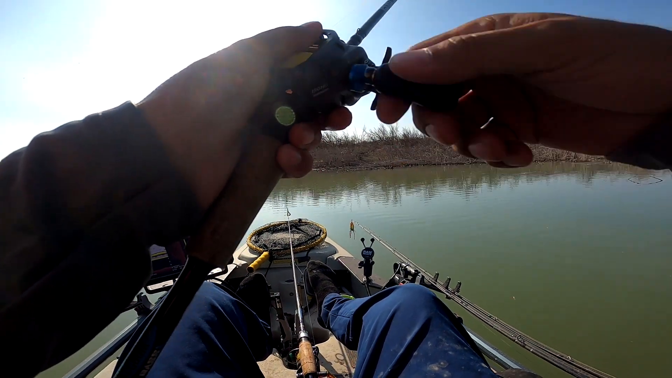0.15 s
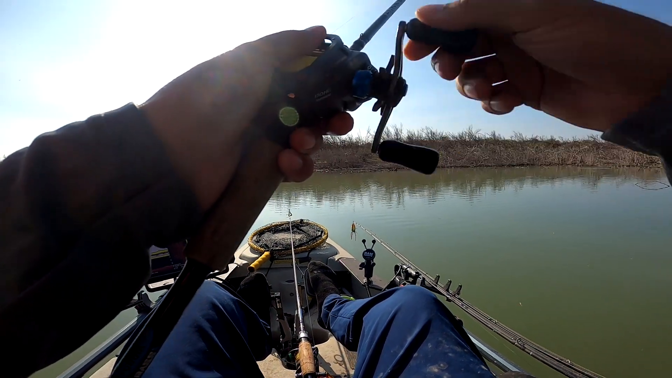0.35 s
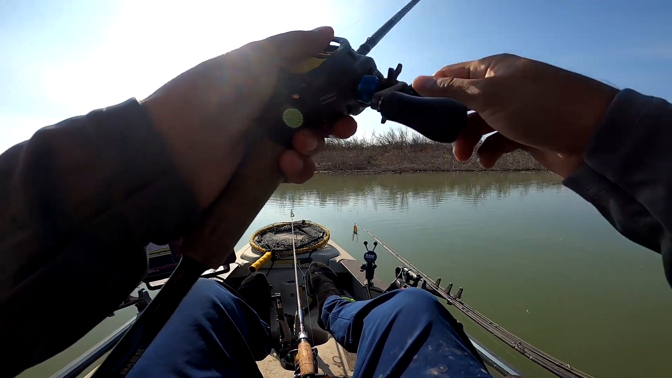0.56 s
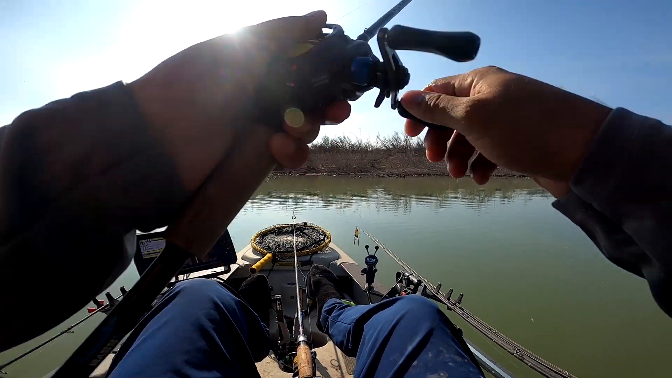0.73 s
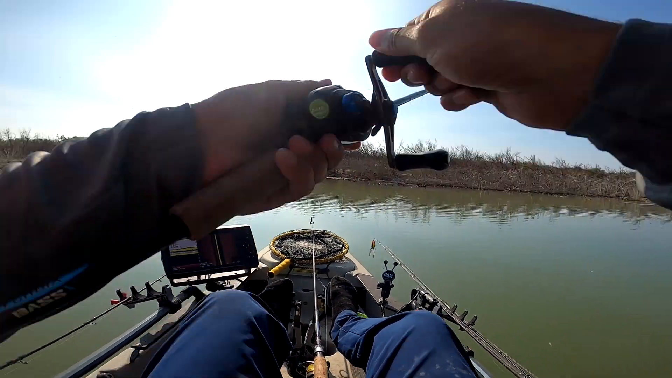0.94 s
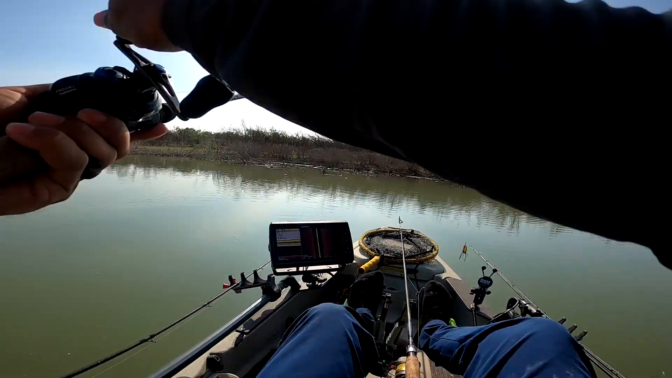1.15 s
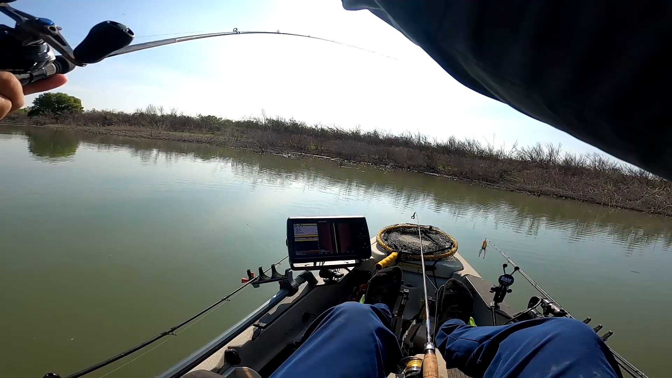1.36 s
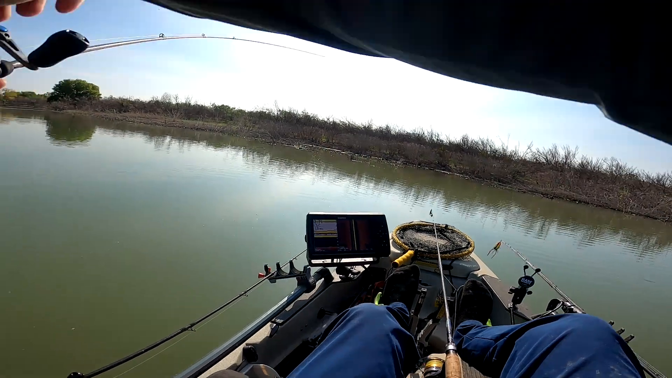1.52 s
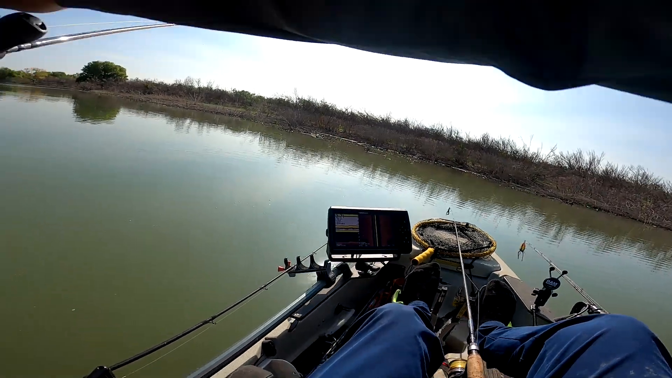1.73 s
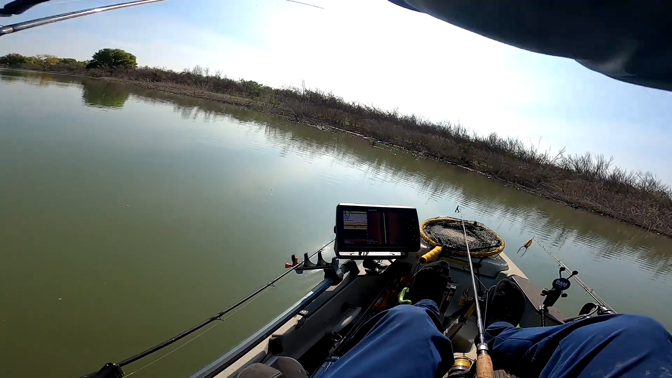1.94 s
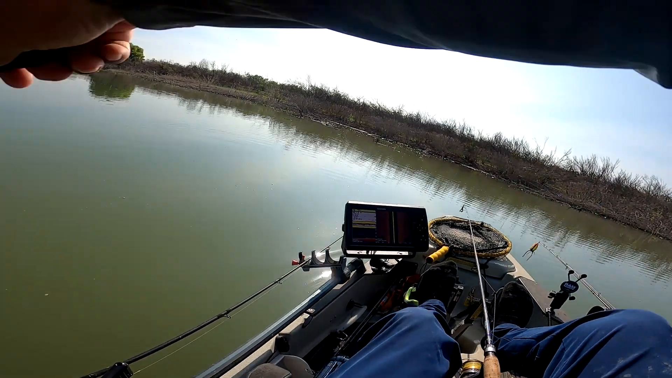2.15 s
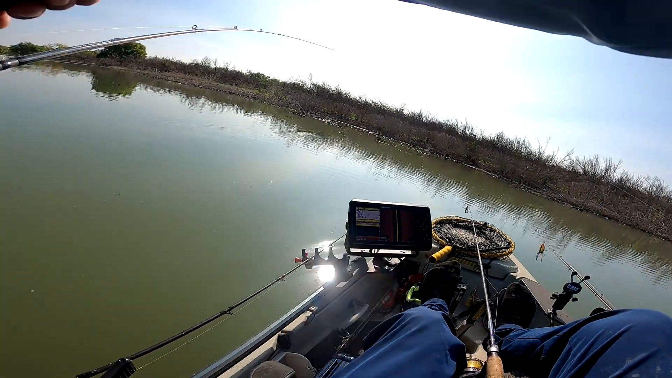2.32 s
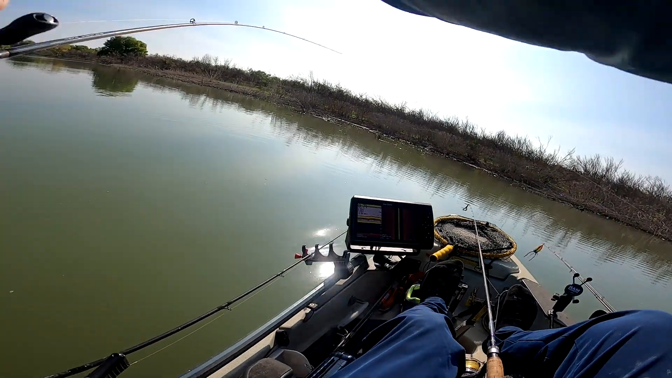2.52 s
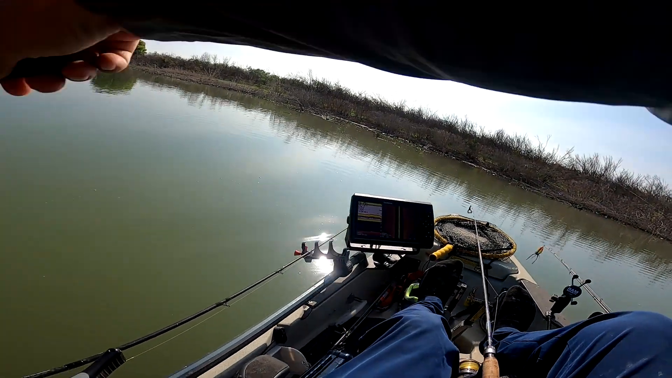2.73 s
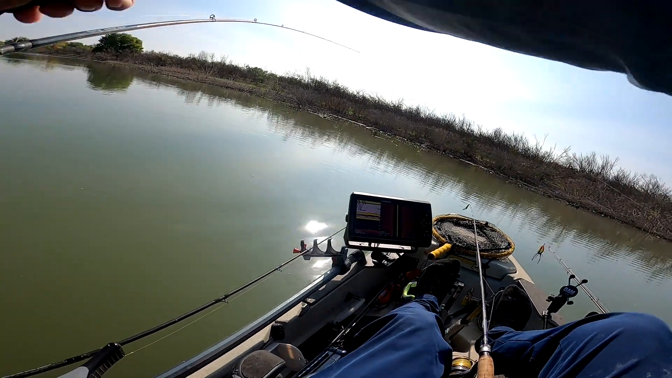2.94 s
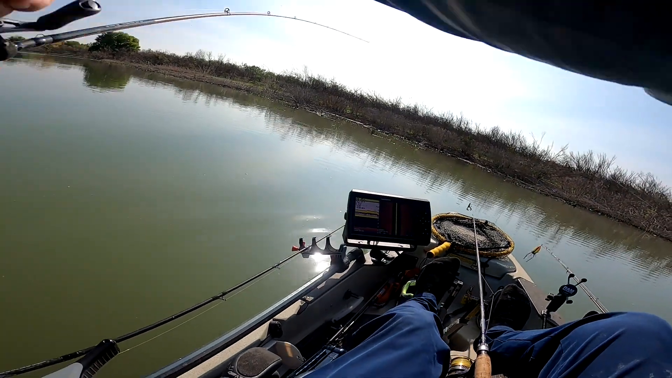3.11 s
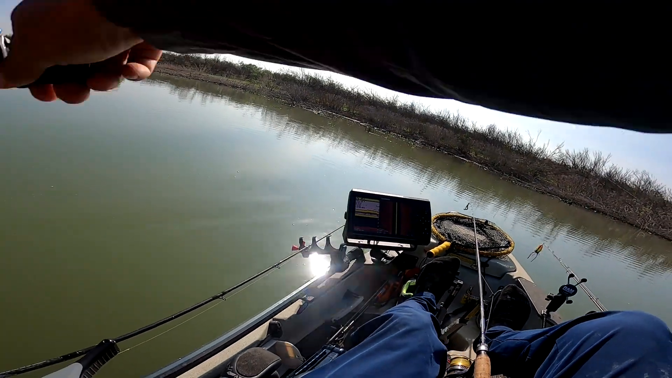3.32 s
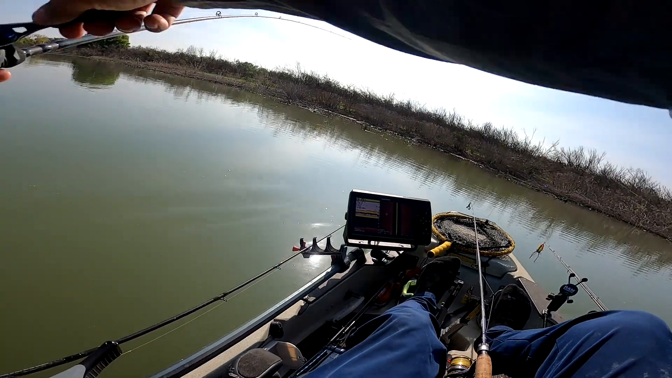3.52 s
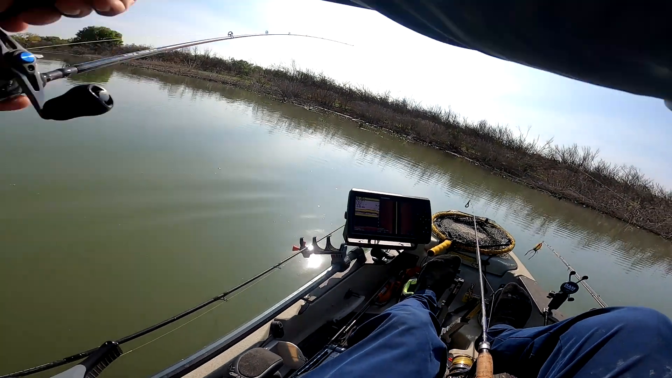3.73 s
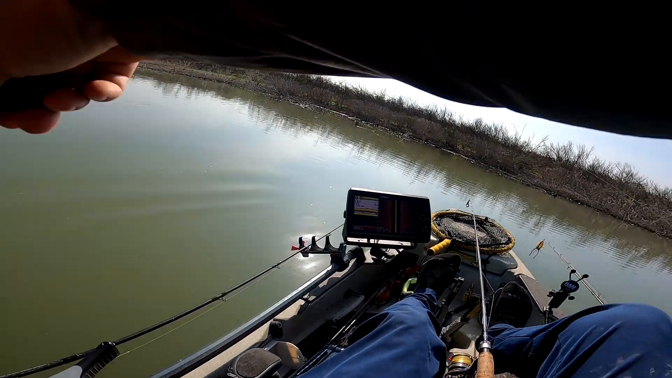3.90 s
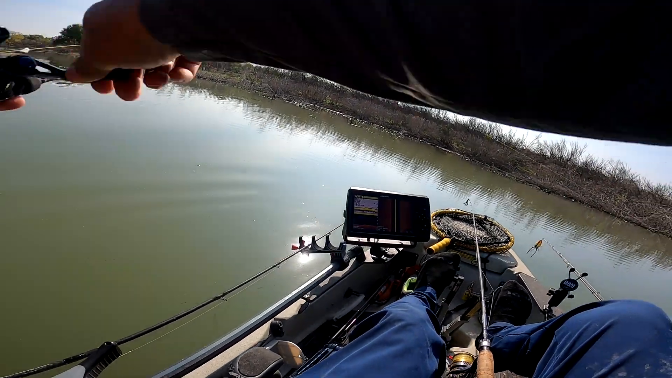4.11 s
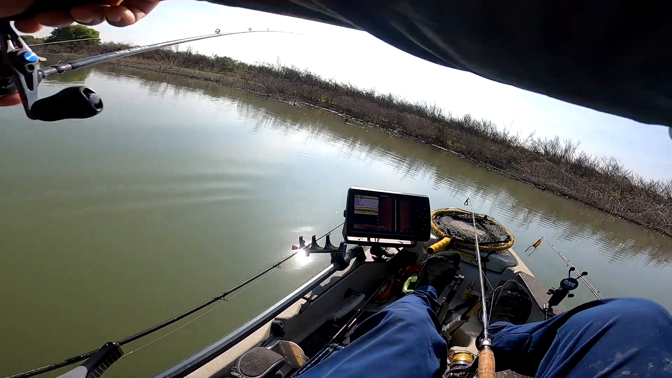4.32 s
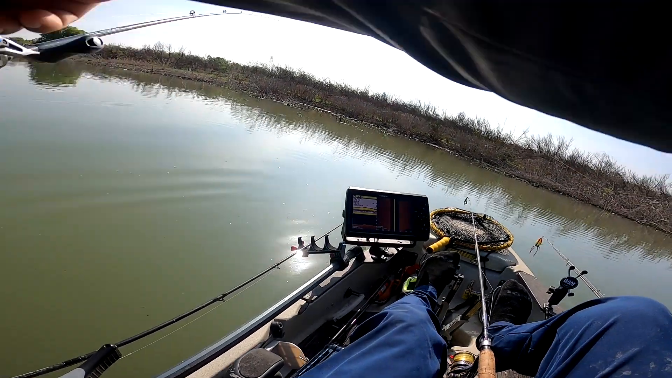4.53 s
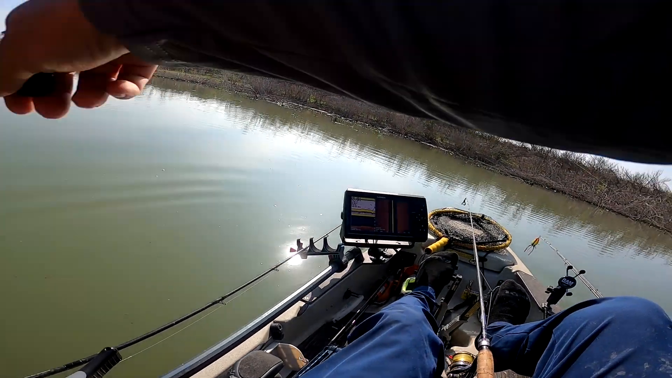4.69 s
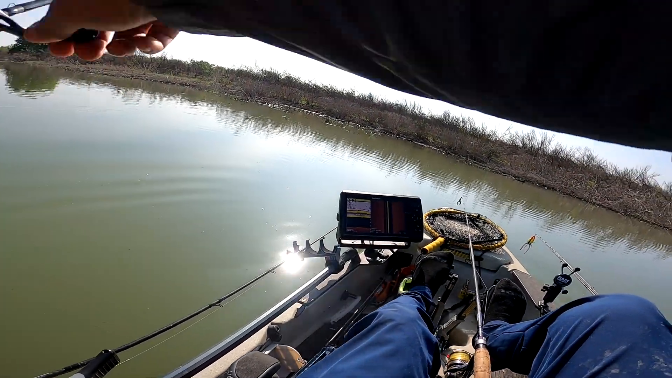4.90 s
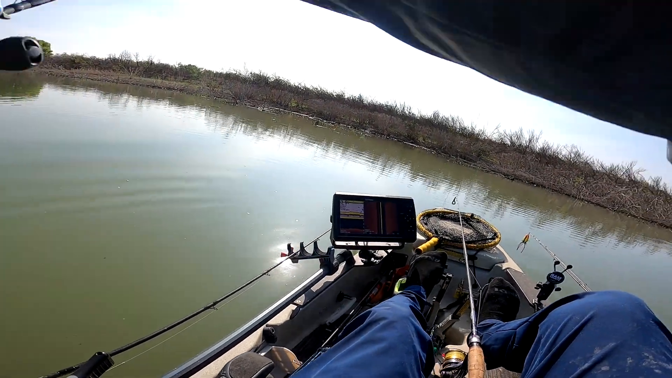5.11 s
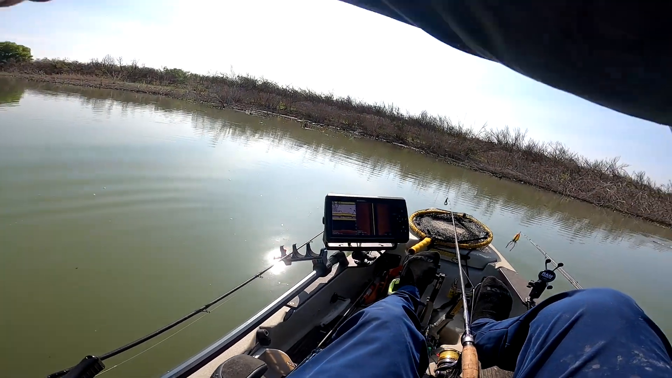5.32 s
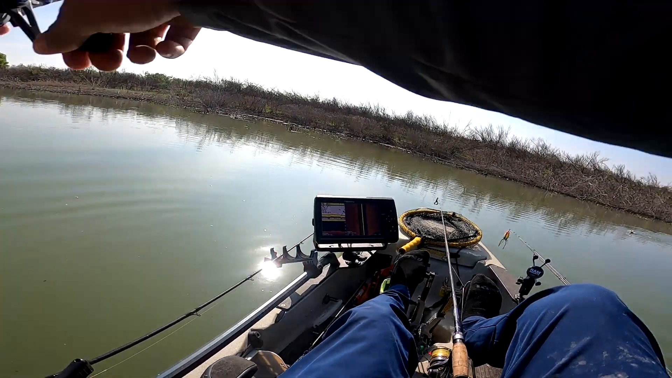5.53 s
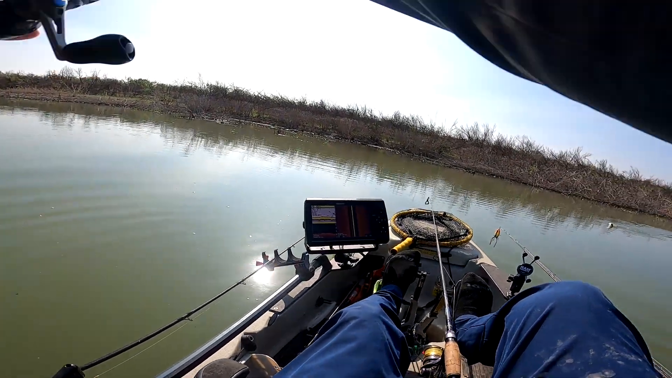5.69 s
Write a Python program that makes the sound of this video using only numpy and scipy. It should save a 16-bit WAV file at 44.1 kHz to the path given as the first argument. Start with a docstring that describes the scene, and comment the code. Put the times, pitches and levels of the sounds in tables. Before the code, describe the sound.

A fishing rod sweeps aside with jacket rustle and clicks, then the reel snaps into gear and is cranked hard with an uneven whine.

```python
"""An angler in a kayak, heard from a chest camera. First the reel winds slowly, a soft brush in its
housing. From 0.7 s the rod sweeps aside: air hisses, the jacket rumbles and rustles on the camera,
tackle clicks and the hull is knocked. At 1.77 s the clutch snaps in and the line rasps as it comes
tight. Then the reel is cranked hard to the end, its gear teeth whining at a pitch that follows the
uneven hand, among more rubs, clicks and knocks."""
import sys
import numpy as np
from scipy import signal
from scipy.fft import rfft, irfft, next_fast_len
from scipy.io import wavfile
from scipy.ndimage import uniform_filter1d

SR = 44100
rng = np.random.default_rng(int(sys.argv[2]) if len(sys.argv) > 2 else 0)


def log_audio(samples):
    """Write samples as a 16-bit WAV file to the path given in sys.argv[1]."""
    # one column per channel
    frames = np.atleast_2d(samples).T
    # limit to full scale, then quantise
    limited = np.clip(frames, -1, 1)
    pcm = np.round(limited * 32767).astype(np.int16)
    wavfile.write(sys.argv[1], SR, pcm)


N = 258137
T = np.arange(N) / SR
F = np.fft.rfftfreq(next_fast_len(N), 1 / SR) + 1

# the arm sweeps the rod aside and settles: t/s, jacket rumble/dB, jacket rustle/dB, air hiss/dB
ARM_SWEEP = [(0, -72, -64, -79), (.69, -54.5, -65, -56), (.728, -51, -47, -57), (.92, -37, -40, -41),
             (.98, -30.5, -37, -36.5), (1.07, -21.5, -27, -31.5), (1.115, -25, -29.5, -30.5),
             (1.165, -22.5, -28.5, -40), (1.25, -35, -46, -42), (1.375, -43, -57, -47),
             (1.48, -36, -51, -40.5), (1.64, -50, -52.5, -50), (1.72, -39, -43, -39.5),
             (1.77, -42.5, -45.5, -61), (2.45, -49, -45, -90), (2.95, -47.5, -50.5, -90),
             (4.45, -57.5, -59, -90), (5.86, -49.5, -46.5, -90)]
# single rubs of the jacket on the camera: t/s, half length/s, rumble/dB, rustle/dB
JACKET_RUBS = [(1.314, 0.056, -33.5, -43), (1.427, 0.041, -34.5, -49), (1.555, 0.026, -43, -43.5),
               (1.611, 0.021, -53, -36.5), (1.67, .03, -40, -63), (1.782, 0.016, -30.5, -58),
               (1.912, 0.036, -34, -30.5), (2.024, 0.038, -38, -37.5), (2.28, 0.14, -49.5, -57),
               (2.607, 0.069, -39, -45.5), (3.072, 0.014, -71, -47.5), (3.212, 0.016, -41.5, -46.5),
               (3.481, 0.046, -57, -42), (3.605, 0.027, -51, -49.5), (3.698, 0.037, -63, -38.5),
               (3.966, 0.037, -54, -40), (4.078, 0.055, -50, -71), (4.302, 0.015, -63, -41),
               (4.861, 0.038, -47, -63), (5.11, 0.08, -55, -49), (5.63, 0.022, -40.5, -38)]
# low end of the cloth: f/Hz, gain/dB
RUMBLE_EQ = [(8.8, 2.5), (15, 2), (70, -3), (97, -7.5), (222, -8.5), (272, -12.5), (400, -16.5), (520, -67),
             (880, -120)]
# crackle of the cloth: f/Hz, gain/dB
RUSTLE_EQ = [(120, -8.5), (250, -2.5), (450, -3.5), (800, -7.5), (1500, -15), (2800, -22.5), (5000, -23.5),
             (11000, -43), (16000, -63)]
# noise bands of a faint, steady drone: f/Hz, width/Hz, level/dB
DRONE_BANDS = [(79, 14, -73), (174.6, 61, -57.5), (684, 120, -69.5)]
# air hiss of the sweep: f/Hz, gain/dB
SWISH_EQ = [(600, -12), (1200, -2), (2700, -7.5), (5400, -17), (8500, -22), (10500, -31.5), (16000, -42)]

# sharp ticks of tackle, and finer, brighter ticks of the line running through its guides: t/s, peak/dB, f/Hz,
# left minus right/dB
SHARP_TICKS = [(0.769, -34, 2600, 8), (0.935, -33, 6270, 3), (1.051, -23, 2870, 1), (1.0864, -40, 3970, 4),
               (1.111, -11, 2800, 12), (1.1135, -17.5, 2100, 20), (1.1284, -20, 1820, 16),
               (1.1305, -22, 5200, 3), (1.1598, -26, 2000, 18), (1.168, -38, 8000, -1),
               (1.1972, -17.5, 2120, 5), (1.227, -32, 3900, 2), (1.2275, -35, 8400, -4),
               (1.28, -29, 4270, 11), (1.4277, -38, 5000, 9), (1.4454, -38, 2000, 11),
               (1.475, -28, 3700, 11), (1.4912, -25.5, 1690, 10), (1.683, -20.5, 3730, 9),
               (2.488, -33, 4260, 3), (2.671, -43, 5310, 4), (4.172, -51, 5635, 4), (4.337, -43, 5650, 4),
               (5.324, -35, 5100, 4), (5.399, -51, 8500, -2), (5.639, -43, 8000, -2),
               (5.6425, -44, 8030, -2)]
# ring of a tick: pitch ratio, gain/dB, t60/s
TICK_RING = [(1, 0, .007), (.6, -4, .007), (1.6, -5, .005), (2.3, -11, .004), (3.4, -22, .003)]
# duller clicks: t/s, peak/dB, f/Hz, left minus right/dB
TACKLE_CLICKS = [(0.635, -42, 1160, 1), (0.637, -41, 1650, 4), (0.729, -30, 980, 3), (1.063, -17.5, 910, 2),
                 (1.2, -25, 870, 2), (1.46, -22, 980, 11), (1.544, -35, 920, 1.5), (1.613, -26, 934, 13.5),
                 (1.634, -36, 1170, 3), (1.65, -36, 1030, 17), (5.102, -28, 1470, 1), (5.606, -24, 1032, 9),
                 (5.616, -35, 1063, 9), (5.6225, -31, 1071, 3), (5.639, -23.5, 983, 11)]
# ring of a click: pitch ratio, gain/dB, t60/s
CLICK_RING = [(1.023, 8, 0.016), (0.363, -6, 0.022), (0.66, -7.5, 0.02), (0.99, -11, 0.043),
              (2.52, -2, 0.009)]
# blows through hull and harness: t/s, peak/dB, f/Hz, left minus right/dB
HULL_KNOCKS = [(0.729, -31.5, 154, 3), (0.841, -30, 132, 4), (1.471, -22, 73.5, 6), (1.609, -26.5, 161, 6),
               (2.543, -15.5, 292.3, 1.5), (2.561, -17, 273.3, 1), (2.618, -28, 309, 1.5)]
# ring of a knock: pitch ratio, gain/dB, t60/s
KNOCK_RING = [(0.999, 7, 0.084), (2.1, 0.5, 0.038), (3.3, 1, 0.019)]
# the clutch snaps in: t/s, peak/dB, f/Hz, left minus right/dB
CLUTCH_SNAP = [(1.76895, -3, 2630, 10)]
# ring of the snap: pitch ratio, gain/dB, t60/s
SNAP_RING = [(1, 0, .0026), (.42, -15, .008), (.7, -5, .0025), (1.5, -4, .002), (3.4, -15, .0018),
             (4.4, -14, .0018)]
# the clutch's thump in the harness: t/s, peak/dB, f/Hz, left minus right/dB
CLUTCH_THUMP = [(1.7704, -12, 153, 4.2)]
# ring of the thump: pitch ratio, gain/dB, t60/s
THUMP_RING = [(0.97, 11.5, 0.035), (1.9, 5, 0.017), (.45, -25, .15)]
# the line comes tight: t/s, level/dB
RASP_ENVELOPE = [(1.86, -74), (1.903, -32), (1.909, -24.5), (1.93, -21), (1.96, -19), (1.99, -27),
                 (2.025, -32), (2.05, -33), (2.075, -32.5), (2.11, -42)]
# resonances of the rod blank: f/Hz, width/Hz, gain/dB
ROD_MODES = [(483, 100, -33), (904, 880, -2.5), (1426, 310, 3), (1760, 650, -11), (2400, 330, -3.5)]

# swell of the slow winding: t/s, level/dB
SLOW_ENVELOPE = [(0, -53.5), (.4, -53.5), (.44, -48.5), (.6, -54.5), (.69, -62), (.95, -39)]
# reel housing, wound slowly: f/Hz, gain/dB
SLOW_EQ = [(300, -37), (600, -31), (750, -12.5), (950, -17.5), (1400, -30), (2200, -17), (2700, -12),
           (3300, -23), (4300, -35.5), (5400, -28), (7300, -27.5), (16000, -51)]
# reel housing, cranked hard: f/Hz, gain/dB
CRANK_EQ = [(240, -69), (500, -17.5), (1250, -3), (1550, -4.5), (2600, -2), (3700, -8.5), (5900, -13),
            (6900, -13), (9000, -22.5), (13000, -35), (16000, -45)]
# resonances of the housing: f/Hz, width/Hz, boost/dB
HOUSING_MODES = [(729, 102, 9), (1756, 366, 8), (2411, 80, 9), (2669, 56, 13), (3060, 160, 7.5),
                 (3260, 68, 7.5), (4296, 380, 13.5), (5034, 900, 11.5), (5803, 360, 11.5)]
# even pace of the cranking: t/s, tooth rate/Hz, level/dB, whine over hiss/dB,
# overtone gain/dB, hiss treble/dB
CRANK_PACE = [(1.79, 1299, -54, -22, -5, 1), (1.815, 1497, -40, -19, 0, 3),
              (2.1, 1580, -32.5, -21, -5, 6.5), (2.3, 1662, -35, -3, -5, 2.5),
              (2.7, 1620, -34, -14, -3, 7.5), (3.0, 1740, -35, -7, -4.5, 6.5), (3.4, 1500, -33, -9, -2, 7),
              (3.8, 1720, -34.5, -10.5, -5, 6), (4.1, 1550, -34, -9.5, -3.5, 6),
              (4.6, 1680, -37.5, -11, -5, 2.5), (5.0, 1753, -35, -20, -8, 0),
              (5.45, 1621, -33.5, -5, -7, 4.5), (5.86, 1547, -34.5, -16, -5, 1)]
# the hand pushes or falters, as offsets to that pace: t/s, tooth rate/octaves, rise/s, fall/s,
# level/dB, whine/dB, overtones/dB
HAND_PUSHES = [(1.924, 0.95, 0.037, 0.04, 8.5, 12, 2), (1.997, -.069, .02, 0.022, -8, -4, -2),
               (2.046, .7, .016, 0.02, 1.5, -16, 3), (2.097, -.3, 0.026, 0.022, -8, 0, -7),
               (2.138, .02, .014, 0.01896, -1.5, 15, 1), (2.208, 0.43, .062, 0.056, 6, 5, 5.5),
               (2.331, 0.79, 0.026, 0.025, 6.5, -4.5, 0.5), (2.456, -0.37, .026, 0.023, -8, -17, -7),
               (2.521, 0.99, 0.028, .05, 6, 1, 3.5), (2.599, -.57, .022, .021, -8.5, -2, -5),
               (2.757, -0.23, .021, .022, 0, 7, -8), (2.813, 0.56, 0.013, 0.051, 4.5, 0, 5),
               (2.93, 0.19, 0.027, 0.036, 1, 0, 6), (3.034, -0.18, .02, .02, -1, -8, 3),
               (3.098, 0.62, .018, 0.06, 3.5, -1, 3), (3.205, -0.23, 0.023, .02, -1.3, -21, -9),
               (3.298, -0.0044, .05, .04, -0.5, 2.5, -6), (3.41, 0.51, 0.041, .045, 2.5, 5, 5),
               (3.512, 0.49, .019, 0.031, 2, 4, -1), (3.668, 0.62, .034, 0.033, 4, 2, 2.5),
               (3.909, -0.21, .021, 0.014, 2, 0, -9), (3.96, 0.75, 0.024, .059, 2.5, 3, 3),
               (4.036, -0.34, .015, 0.024, -0.5, 4, 3), (4.172, 0.26, .019, .018, 2.5, 3, 2),
               (4.23, 0.59, 0.021, 0.031, 4.5, 5, 2), (4.458, 0.41, 0.019, .023, 2.5, -12, 5),
               (4.541, .62, .04, .045, 2.5, -4, 5), (4.623, -0.24, .017, 0.017, -0.5, 3, -9),
               (4.729, -0.24, .03, 0.01, 1.5, 0, 3), (4.766, .82, .02, .072, 1, -14, -3),
               (4.919, 0.11, 0.031, .031, -1.5, 8, -3), (4.975, -.31, 0.014, .015, 2.5, -1, -14),
               (5.06, 0.57, .04, .03, 3, -8, 0), (5.135, -0.38, 0.037, 0.037, -2, 6, 4),
               (5.241, 0.57, 0.022, 0.019, 2.5, -8, -10), (5.287, -0.45, 0.02, 0.016, -6, 3, 4),
               (5.323, 0.063, 0.015, .025, 3, 0.5, -3), (5.385, .32, .026, .015, -.5, -3, 0),
               (5.423, -0.45, .022, .028, -3, -0.5, -2), (5.5, 0.077, 0.032, 0.037, 1, 7, 0),
               (5.552, 0.42, 0.023, 0.024, 2.5, 0, 2.5), (5.66, 0.61, 0.073, 0.03, 3.5, 3, 2),
               (5.74, -0.071, 0.033, 0.041, 0.5, 11, -5), (5.856, 0.65, 0.046, 0.032, 5.5, 14, -1)]

# shadow of the chest: f/Hz, share of the pan
CHEST_SHADOW = [(100, 0.13), (400, 0.091), (1300, 0.2), (2400, 1), (4400, 0.72), (8000, 0.49),
                (15000, -0.4)]
# sound scattered into the right port: f/Hz, scattered over direct/dB
CHEST_SCATTER = [(60, -3.5), (300, 0.5), (1400, 1.5), (3100, -1.5), (6800, 7.5), (14000, 8)]

CLOTH_GRAIN_DB, RASP_GRAIN_DB = 2.2, 2.8
CRACK_DB, CRACK_T60_S, CRACK_TOP = -6, .006, 1.5  # a tick's noisy attack, dull above CRACK_TOP x pitch
MODE_FLICKER_DB, MODE_FLICKER_HZ, TOOTH_FLICKER_DB = 3.2, 24, 3.1
TOOTH_JITTER, SMEAR_JITTER = .03, .14  # shares of the tooth rate
OVERTONES_DB = [3, 1.5, -3.5]  # harmonics 2 to 4 of the tooth rate
GUIDE_RATIO, GUIDE_DB = .43, -8  # the line-guide gear turns slower
PLATE_HZ, PLATE_WIDTH_HZ, PLATE_DB = 2727, 160, -4.5  # the side plate rings under hard strokes
PUSH_WHINE_DB = 5  # extra whine per octave of push
PORT_LAG_S, TOP_HZ = 2.4e-5, 15700  # delay of the right port; the camera's top end
SCATTER_DRIFT_RAD, SCATTER_DRIFT_HZ = 1.71, 7.56  # the scattered path shifts as the arms move


def undb(db):
    """Gain of a level in dB."""
    return 10 ** (np.asarray(db) / 20)


def unit(x):
    """Scale to rms 1."""
    return x / np.sqrt(np.mean(x ** 2))


def envelopes(table):
    """Each column as a curve over time, -120 outside the table's span."""
    s, *columns = np.transpose(table)
    return [np.interp(T, s, c, left=-120, right=-120) for c in columns]


def over_hz(table):
    """A curve through the table's points on a log frequency axis."""
    hz, value = np.transpose(table)
    return np.interp(np.log(F), np.log(hz), value)


def filtered(x, gain):
    """Multiply the spectrum by a gain."""
    return irfft(rfft(x, next_fast_len(N)) * gain, next_fast_len(N))[..., :N]


def resonance(hz, width):
    """Gain of one resonant peak, 1 at its centre."""
    return 1 / (1 + (2 * (F - hz) / width) ** 2)


def wobble(rate):
    """Smooth random modulation of rms 1, changing about rate times a second."""
    k = max(int(SR / rate), 1)
    return unit(uniform_filter1d(uniform_filter1d(rng.standard_normal(N), k), k))


def grit(spread_db, rate):
    """Grainy noise with a fluttering level."""
    return unit(rng.standard_normal(N) * undb(spread_db * wobble(rate)))


def swells(s, rise_s, fall_s, squareness):
    """One swell of height 1 per event; squareness 2 is a bell curve, more flattens the top."""
    late = T - s[:, None]
    return np.exp(-np.where(late < 0, -late / rise_s[:, None], late / fall_s[:, None]) ** squareness)


def struck(events, modes, rise_s, crack=0):
    """Panned blows ring the modes of the thing struck; hard contacts add a crack of noise."""
    out, t = np.zeros((2, N + SR)), T[:SR // 4]
    for s, db, hz, pan_db in events:
        ring = sum(undb(mode_db - 60 * t / t60) * np.sin(2 * np.pi * hz * ratio * t)
                   for ratio, mode_db, t60 in modes if hz * ratio < TOP_HZ)
        lowpass = signal.butter(4, min(CRACK_TOP * hz, TOP_HZ), fs=SR)
        burst = signal.lfilter(*lowpass, rng.standard_normal(len(t)))
        ring += crack * unit(burst) * undb(-60 * t / CRACK_T60_S)
        ring *= 1 - np.exp(-t / rise_s)
        gains = undb(db + np.array([[pan_db], [-pan_db]]) / 2)
        at = int(s * SR)
        out[:, at:at + len(t)] += gains * ring / np.abs(ring).max()
    return out[:, :N]


def mic_ports(x, pan_db):
    """Stereo at two ports: the chest shades the right one's treble and scatters sound into it."""
    shade = undb(pan_db * over_hz(CHEST_SHADOW) / 2)
    t = T[:SR // 8]
    echoes = rng.standard_normal((2, len(t))) * np.exp(-t / 0.0056)
    echoes /= np.sqrt(np.sum(echoes ** 2, axis=1, keepdims=True))
    scatter = undb(over_hz(CHEST_SCATTER))
    right_gain = 1 / shade / np.sqrt(1 + scatter ** 2)
    direct = filtered(x, right_gain * np.exp(-2j * np.pi * F * PORT_LAG_S))
    paths = filtered(x, right_gain * scatter * rfft(echoes, next_fast_len(N)))
    angle = SCATTER_DRIFT_RAD * wobble(SCATTER_DRIFT_HZ)
    return np.array([filtered(x, shade), direct + np.cos(angle) * paths[0] + np.sin(angle) * paths[1]])


def drone():
    """A faint, low bed of narrow noise bands."""
    return sum(undb(db) * unit(filtered(rng.standard_normal(N), resonance(hz, width)))
               for hz, width, db in DRONE_BANDS)


def jacket():
    """Cloth drags over the camera: lumpy rumble and crackling rustle."""
    rumble_db, rustle_db, _ = envelopes(ARM_SWEEP)
    s, half_s, rub_rumble_db, rub_rustle_db = np.transpose(JACKET_RUBS)
    rubs = swells(s, half_s, half_s, squareness=3.3)
    rumble = unit(filtered(grit(CLOTH_GRAIN_DB, 37), undb(over_hz(RUMBLE_EQ))))
    rustle = unit(filtered(grit(CLOTH_GRAIN_DB, 86), undb(over_hz(RUSTLE_EQ))))
    rumble *= undb(rumble_db) + undb(rub_rumble_db) @ rubs
    rustle *= undb(rustle_db) + undb(rub_rustle_db) @ rubs
    return rumble + rustle


def swish():
    """Airy hiss rides the sweep of the rod."""
    _, _, air_db = envelopes(ARM_SWEEP)
    return undb(air_db) * unit(filtered(grit(2.4, 150), undb(over_hz(SWISH_EQ))))


def hull():
    """Soft-edged knocks carry through the hull and the harness."""
    return struck(HULL_KNOCKS, KNOCK_RING, rise_s=0.0017)


def small_contacts():
    """Small contacts: bright, cracking ticks of tackle and of the line in its guides, and duller clicks of
    tackle."""
    ticks = struck(SHARP_TICKS, TICK_RING, rise_s=0.00018, crack=undb(CRACK_DB))
    return ticks + struck(TACKLE_CLICKS, CLICK_RING, rise_s=0.00029)


def clutch():
    """The clutch snaps in, then its thump reaches the harness in opposite polarity."""
    snap = struck(CLUTCH_SNAP, SNAP_RING, rise_s=0.00012)
    thump = struck(CLUTCH_THUMP, THUMP_RING, rise_s=0.00052)
    return thump - snap


def line_rasp():
    """Dense slips of the line under load ring the rod blank."""
    blank = sum(undb(db) * resonance(hz, width) for hz, width, db in ROD_MODES)
    return undb(envelopes(RASP_ENVELOPE)[0]) * unit(filtered(grit(RASP_GRAIN_DB, 890), blank))


def housing(x, eq):
    """The reel housing: broad colour with sharper modes that come and go under the grip."""
    broad = undb(over_hz(eq))
    boosts = np.array([broad * (undb(db) - 1) * resonance(hz, width) for hz, width, db in HOUSING_MODES])
    rings = sum(undb(MODE_FLICKER_DB * wobble(MODE_FLICKER_HZ)) * ring for ring in filtered(x, boosts))
    return filtered(x, broad) + rings


def slow_winding():
    """Gentle turning brushes the housing with soft grit."""
    return undb(envelopes(SLOW_ENVELOPE)[0]) * unit(housing(grit(1.64, 59), SLOW_EQ))


def hand():
    """The hand plays the reel's pitch, level and tone: an even pace with pushes and falters on top."""
    hz, level_db, whine_db, overtones_db, treble_db = envelopes(CRANK_PACE)
    s, octaves, rise_s, fall_s, push_db, clear_db, bright_db = np.transpose(HAND_PUSHES)
    pushes = swells(s, rise_s, fall_s, squareness=2.2)
    hz = np.maximum(hz, 1000) * 2 ** (octaves @ pushes)
    level_db += push_db @ pushes
    whine_db += (PUSH_WHINE_DB * octaves + clear_db) @ pushes
    overtones_db += bright_db @ pushes
    return hz, level_db, whine_db, overtones_db, treble_db


def gear_teeth(hz, overtones_db, jitter, jitter_hz):
    """Meshing teeth sing at the tooth rate and its overtones; uneven teeth shake pitch and level."""
    phase = 2 * np.pi * np.cumsum(hz * (1 + jitter * wobble(jitter_hz))) / SR
    overtones = sum(undb(db + TOOTH_FLICKER_DB * wobble(74)) * np.sin(k * phase)
                    for k, db in enumerate(OVERTONES_DB, start=2))
    return undb(TOOTH_FLICKER_DB * wobble(150)) * np.sin(phase) + undb(overtones_db) * overtones


def hard_cranking():
    """Tooth whine, its rough smear, the line-guide gear and bearing hiss ring the housing."""
    hz, level_db, whine_db, overtones_db, treble_db = hand()
    guide_gain = undb(GUIDE_DB + 2.2 * wobble(60))
    guide_hz = GUIDE_RATIO * hz * (1 + TOOTH_JITTER * wobble(246))
    guide = guide_gain * np.sin(2 * np.pi * np.cumsum(guide_hz) / SR)
    # speed roughens the mesh: more jitter, more smear
    whine = undb(whine_db) * (gear_teeth(hz, overtones_db, TOOTH_JITTER * hz / 1800, 320) + guide)
    smear = undb(-7.5) * (hz / 2000) ** 1.4 * gear_teeth(hz, overtones_db, SMEAR_JITTER, 900)
    hiss = grit(2.0, 660)
    treble = filtered(hiss, 1 / np.sqrt(1 + (4200 / F) ** 6)) * (undb(treble_db) - 1)
    # faster turning throws more of the hiss into the very top
    sizzle = filtered(hiss, 1 / np.sqrt(1 + (9500 / F) ** 8)) * ((hz / 1900) ** 1.2 - 1)
    plate = filtered(grit(2.6, 60), resonance(PLATE_HZ, PLATE_WIDTH_HZ))
    plate *= undb(PLATE_DB + 4.45 * np.clip(level_db + 33.5, -30, 8))
    body = housing(hiss + treble + sizzle + whine + smear + plate, CRANK_EQ)
    # level the blend so that the hand sets the dynamics
    return undb(level_db) * body / np.sqrt(uniform_filter1d(body ** 2, size=3000))


def scene():
    """The stereo mix: slow winding sits near the centre, hard cranking well to the left."""
    hits = small_contacts() + hull() + clutch()
    cranking = mic_ports(hard_cranking() + line_rasp(), pan_db=8.55)
    winding = mic_ports(slow_winding(), pan_db=1.3)
    bed = mic_ports(jacket() + drone() + swish(), pan_db=5.0)
    return bed + hits + winding + cranking


def record(dry):
    """The camera clips at full scale and cuts the top end steeply."""
    return signal.sosfilt(signal.ellip(8, .2, 70, TOP_HZ, fs=SR, output="sos"), np.clip(dry, -1, 1))


dry = scene()
out = record(dry)
log_audio(out)
```